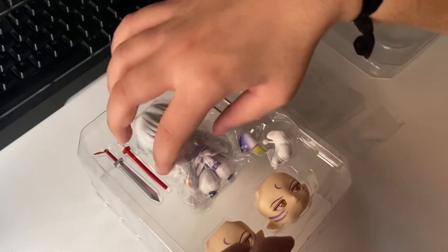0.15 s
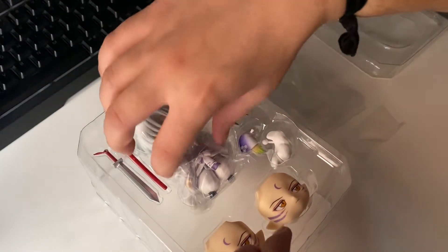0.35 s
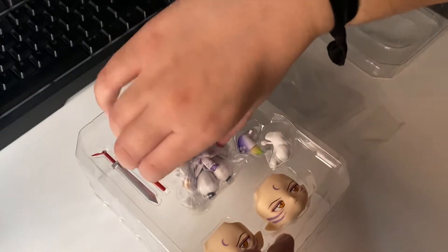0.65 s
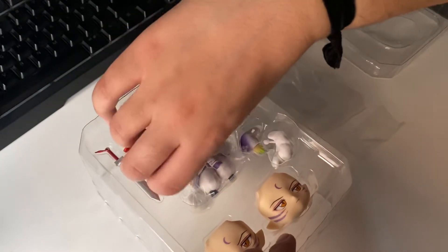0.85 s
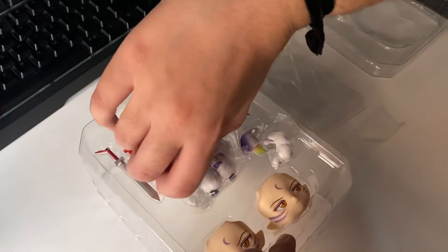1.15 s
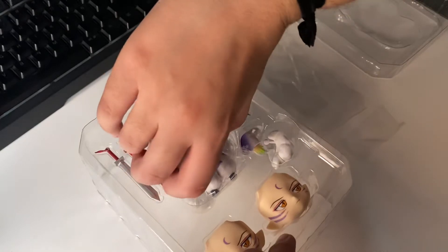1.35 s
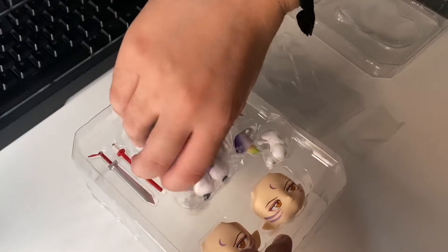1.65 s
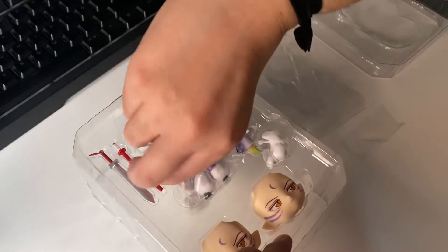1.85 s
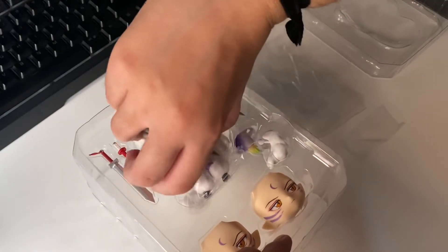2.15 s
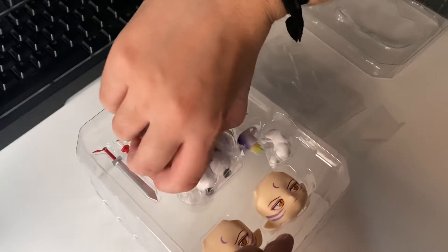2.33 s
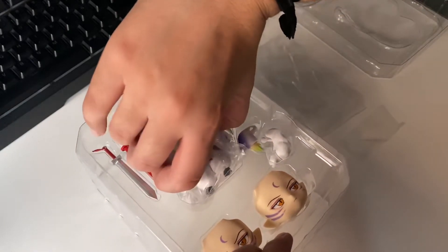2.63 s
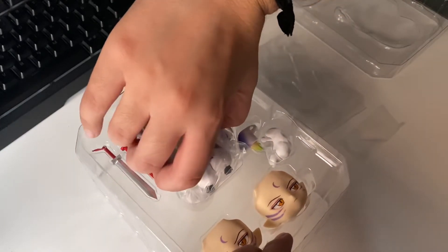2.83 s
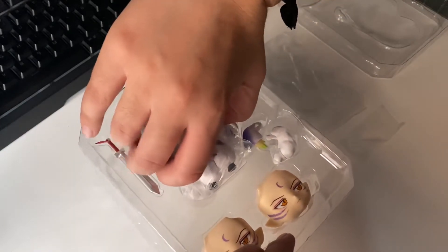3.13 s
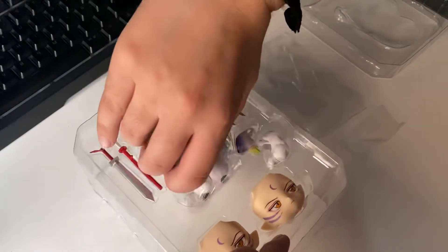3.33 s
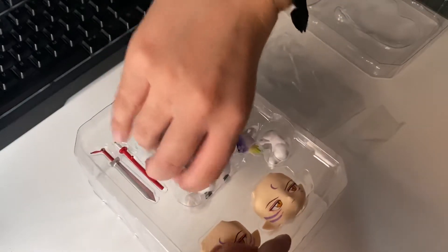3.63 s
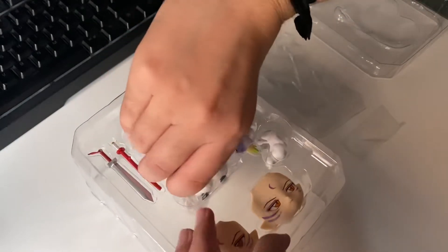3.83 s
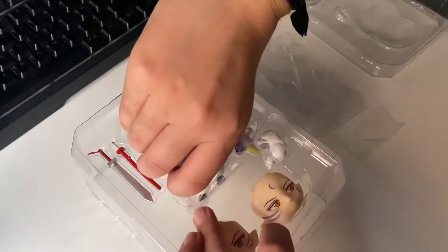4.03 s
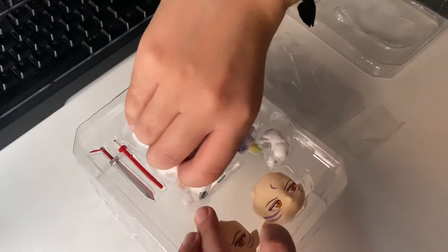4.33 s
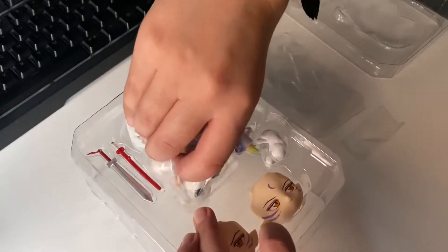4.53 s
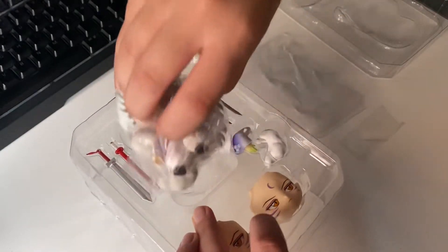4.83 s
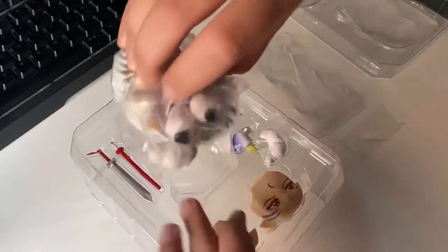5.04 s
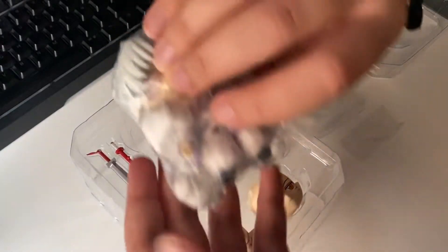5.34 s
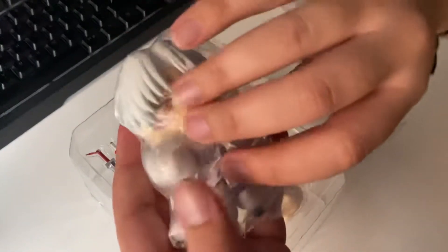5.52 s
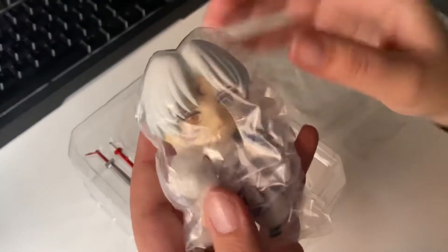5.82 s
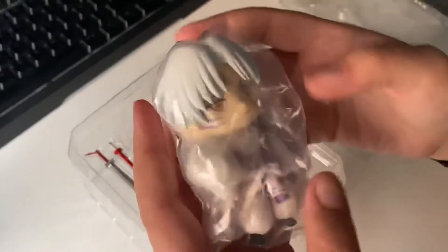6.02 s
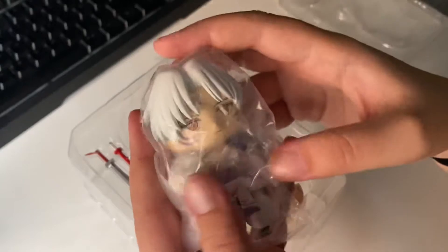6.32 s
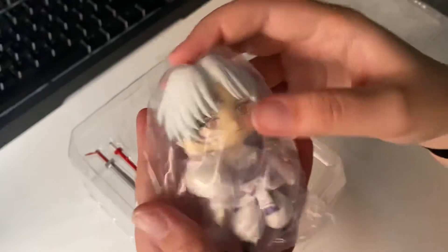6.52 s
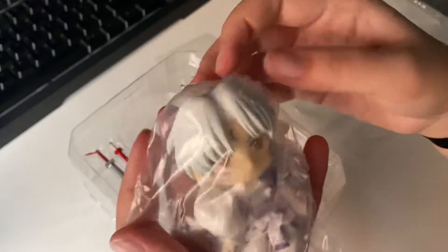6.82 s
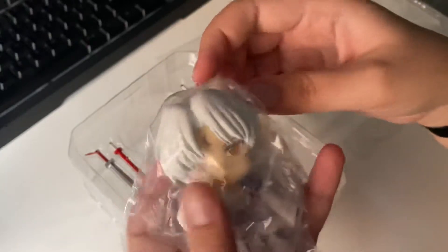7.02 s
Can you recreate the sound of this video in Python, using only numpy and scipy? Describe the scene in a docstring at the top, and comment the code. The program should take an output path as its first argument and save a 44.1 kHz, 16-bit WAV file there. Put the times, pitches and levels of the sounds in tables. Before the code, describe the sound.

Close plastic creaking and hollow knocks with one loud buckle, followed by crisp, dense crinkling of thin film around a small figurine.

```python
"""A moulded plastic tray creaks, knocks and buckles loudly as a hand works a bagged figurine out of it.
The tray rings in its modes, driven by stick-slip jerks and flips of its wall; the buckling bumps the desk.
The thin bag crinkles in clusters of tiny facet clicks, with single snaps and quick chains of them.
Once the bag is raised, it slides over the palm, fingertips pat the figurine and a hard part of it ticks.
A small room, faint noise and a low rumble surround this; two close ports differ in phase."""
import sys
import numpy as np
from scipy import signal
from scipy.fft import rfft, irfft, next_fast_len
from scipy.io import wavfile
from scipy.ndimage import uniform_filter1d

SR = 44100
rng = np.random.default_rng(int(sys.argv[2]) if len(sys.argv) > 2 else 0)


def to_wav(sig):
    """Store sig (one row per channel, or 1-D mono) as 16-bit WAV at the path in sys.argv[1].

    Samples outside -1..1 are clipped; the rate is SR.
    """
    pcm = np.clip(np.atleast_2d(sig), -1, 1) * 32767
    pcm = np.round(pcm).astype(np.int16)
    wavfile.write(sys.argv[1], SR, pcm.T)  # frames by channels


N = 316197
T = np.arange(N) / SR

# Levels are relative: mixing, balance and room come later.
# Room noise colour: (frequency [Hz], gain [dB])
ROOM_NOISE_COLOUR = [(30, -23.5), (110, 13.5), (650, -17.5), (2000, -10.5), (16000, -26)]
# Rumble colour: (frequency [Hz], gain [dB])
RUMBLE_COLOUR = [(20, -20.5), (33, -7.5), (80, 7.5), (100, -2.5), (118, 12), (150, -11.5), (250, -1),
                 (900, -38)]
# Rumble: (time [s], level [dB])
RUMBLE_LEVEL = [(0, -69), (.25, -83), (.7, -60), (1.1, -78), (1.5, -66), (2.3, -64), (2.7, -64.5),
                (3.2, -70), (3.26, -44.5), (3.45, -58), (4.5, -55.5), (5.3, -64), (6.7, -60)]

# Tray modes: (frequency [Hz], strength [dB], undamped t60 [s]); below WALL_HZ whole tray, above it walls
TRAY_MODES = [(224.4, -7.5, 0.051), (295, -10.5, 0.17), (370, -8, 0.073), (437, -5, 0.17),
              (496, 3.5, 0.063), (581.3, 3, 0.053), (697, -1.5, 0.073), (850, -4.5, 0.11),
              (995, -4.5, 0.05), (1079, -7.5, 0.076), (1257, -8, 0.027), (1384, -10.5, 0.018),
              (1646, -13, 0.069), (1940, -24.5, 0.011)]
WALL_HZ = 400
# Freedom of the whole tray to flex under the hand: (time [s], gain [dB])
FLEX = [(0, -0.5), (1.35, -9.5), (1.55, 1), (2.3, 3), (2.8, -6), (3.15, -7), (3.23, -3), (3.6, 3),
        (4.5, -1.5), (5.1, -4.5)]
# Dry crack of the stiff tray wall: (frequency [Hz], gain [dB])
WALL_CRACK_COLOUR = [(400, -17), (900, 6.5), (1600, 10.5), (2200, 2.5), (2900, 6), (4200, -4),
                     (9000, -22.5)]
# Pushes dragging fingers and figurine along the tray: (time [s], length [s], level [dB])
PUSHES = [(.452, 0.0066, -47.5), (.588, .03, -47.5), (.666, 0.02, -54), (.78, 0.02, -42),
          (.81, 0.056, -40.5), (1.203, 0.008, -50), (1.31, 0.015, -52), (1.372, 0.042, -39),
          (1.438, 0.055, -34), (1.615, 0.019, -46), (1.77, 0.057, -49.5), (1.905, 0.019, -44.5),
          (2.235, 0.0089, -39.5), (2.3, 0.02, -57.5), (2.48, 0.008, -49), (2.848, 0.022, -49),
          (2.945, 0.018, -43.5), (3.073, 0.0072, -42), (3.19, 0.03, -37.5), (3.234, 0.047, -24.5),
          (3.32, 0.077, -43), (3.447, 0.026, -46), (3.503, 0.013, -41), (3.608, 0.0099, -42),
          (3.724, 0.022, -35.5), (3.85, 0.0047, -41.5), (4.002, 0.024, -38), (4.097, 0.046, -38),
          (4.225, 0.029, -46), (4.33, 0.0082, -39), (4.475, 0.065, -42), (4.56, 0.032, -46.5),
          (4.802, 0.054, -49.5), (4.934, 0.016, -47), (4.982, 0.029, -42.5)]
PUSH_ATTACK_S, PUSH_T60_S = 0.02, 0.13
# Light rubbing of the resting hand: (time [s], level [dB])
RESTING = [(0, -65.5), (.1, -89), (.3, -76.5), (.6, -57.5), (.9, -58), (1.15, -69), (1.55, -49.5),
           (2.1, -49.5), (2.35, -51.5), (2.7, -57), (3.05, -56), (3.85, -51), (4.25, -53), (4.65, -54),
           (4.78, -80), (5.06, -54), (5.15, -75), (5.4, -72.5), (5.6, -86)]
# Tray wall giving way or being knocked: (time [s], level [dB], centre of answering modes [Hz])
KNOCKS = [(0.142, -67, 800), (0.3772, -52, 1440), (0.4486, -40.5, 1130), (0.566, -46, 434),
          (0.5891, -39.5, 584), (0.668, -46.5, 630), (0.744, -50.5, 684), (0.789, -48, 556),
          (0.8157, -41, 640), (.856, -49, 540), (0.973, -45, 1520), (0.992, -38.5, 614),
          (1.018, -41.5, 657), (1.3669, -45.5, 710), (1.4224, -39, 810), (1.4636, -34.5, 665),
          (1.4979, -37.5, 640), (1.7059, -35.5, 755), (1.898, -43.5, 1080), (2.2445, -39, 560),
          (2.2983, -42.5, 560), (2.381, -34, 560), (2.841, -42, 600), (2.8868, -38, 700), (2.928, -34, 607),
          (3.108, -40.5, 946), (3.1624, -40, 630), (3.2272, -24.5, 640), (3.2307, -21, 352),
          (3.2605, -28.5, 1003), (3.269, -35, 617), (3.2905, -28, 721), (3.324, -39.5, 610),
          (3.454, -37, 640), (3.5904, -48, 920), (3.6139, -37, 472), (3.996, -35.5, 620),
          (4.0915, -45, 600), (4.219, -40.5, 490), (4.508, -43, 850), (4.5802, -40, 755),
          (4.6539, -40, 524), (4.799, -45.5, 590), (4.986, -53, 660), (5.025, -44, 524)]
# Tray, left minus right: (frequency [Hz], level difference [dB])
TRAY_BALANCE = [(300, 0.5), (450, -8), (620, -0.5), (900, -1.5), (2000, -1)]
THUMP_S = 3.229  # buckling tray bumps the desk

# Film rustle: (time [s], length [s], level [dB])
FILM_RUSTLES = [(.005, 0.037, -68), (.335, 0.05, -63), (.556, 0.032, -54), (.932, 0.012, -60),
                (1.42, 0.046, -48), (1.599, 0.032, -56), (1.645, 0.063, -54), (1.772, 0.056, -54),
                (1.892, 0.04, -52), (2.02, 0.02, -52.5), (2.22, 0.033, -56), (3.22, 0.093, -47.5),
                (3.437, 0.031, -49), (3.595, 0.084, -54), (3.857, 0.032, -52.5), (3.997, 0.032, -52.5),
                (4.15, 0.11, -54), (4.65, 0.0091, -46), (5.392, 0.019, -52.5), (5.479, 0.094, -53),
                (5.566, 0.06, -49), (5.66, 0.014, -48.5), (5.922, 0.041, -54), (6.185, 0.046, -49.5),
                (6.312, 0.1, -49), (6.395, 0.073, -49.5), (6.502, 0.035, -43.5), (6.571, 0.028, -41.5),
                (6.642, 0.05, -48), (6.88, 0.035, -40), (6.94, 0.078, -46.5), (7.085, 0.042, -49),
                (7.148, 0.028, -43.5)]
RUSTLE_ATTACK_S, RUSTLE_T60_S = 0.012, 0.1
# Steady crinkling between rustles: (time [s], level [dB])
HOLD = [(0, -104), (.27, -72.5), (.65, -65.5), (1.0, -65), (1.13, -72.5), (1.4, -64), (1.9, -58),
        (2.45, -71), (2.75, -73.5), (3.15, -68), (3.55, -68.5), (3.9, -62.5), (4.7, -57.5), (5.1, -91),
        (5.42, -57.5), (5.77, -69), (6.5, -47.5), (7.15, -60.5)]
PUSH_DRAG_DB = -23  # rubbing the tray also works the film
# Crinkle colour, bag in the tray: (frequency [Hz], gain [dB])
NESTED_COLOUR = [(200, -21), (700, 5), (1500, 0.5), (2800, 7.5), (4000, 0), (7000, -2), (11000, -11),
                 (14000, -2.5), (16000, -34.5)]
# Crinkle colour, bag held up: (frequency [Hz], gain [dB])
HELD_COLOUR = [(100, 2), (300, 9), (1100, 1.5), (2400, 0.5), (5200, 2), (11000, -6.5), (14000, -3),
               (16000, -40)]
LIFT_S = 4.59  # bag comes clear of the tray
# Single creases snapping through: (time [s], level [dB], brightness as treble over body [dB])
SNAPS = [(0.3779, -38, 9.5), (0.3855, -37.5, -7.5), (0.4462, -37, -6.5), (.552, -39, 14.5),
         (0.5905, -39, -4), (0.721, -42, 5), (.7462, -39, 6), (.813, -38, 12), (0.951, -43.5, 6),
         (0.975, -47, -8), (1.0483, -48, 3), (1.359, -48, 3.5), (1.379, -44, 1), (1.418, -37, 32),
         (1.439, -35.5, 7.5), (1.6403, -34, 7), (1.692, -40, -12), (1.7048, -38, -5.5), (1.779, -39, 2),
         (1.8055, -41, -10), (1.8228, -40, 13), (1.8572, -32, -8), (1.898, -45, -10), (1.918, -38.5, 4),
         (1.9743, -39.5, 14.5), (2.109, -44, -9), (2.135, -34.5, -6), (2.184, -38, -8.5),
         (2.217, -38.5, 2.5), (2.245, -39, 6), (2.4287, -32.5, 9), (2.4476, -37, 2.5), (2.609, -44, -6),
         (2.663, -39.5, 3), (2.803, -43.5, -2), (2.886, -39, 6.5), (3.104, -40.5, -11.5), (3.142, -40, 5.5),
         (3.1615, -35.5, -6.5), (3.282, -37, 2.5), (3.437, -38.5, 19), (3.4473, -36.5, 6),
         (3.6325, -36, 12.5), (3.662, -33, -7.5), (3.805, -37.5, -9), (3.825, -39.5, -1.5),
         (3.872, -45, -7), (3.875, -39.5, -7.5), (3.921, -34.5, 3.5), (3.972, -39.5, 13), (4.029, -47, 1.5),
         (4.2004, -38, -3), (4.215, -37.5, 4), (4.3461, -32.5, 1), (4.378, -38, 3), (4.419, -38.5, -1),
         (4.4314, -40, 11), (4.5916, -41, 6.5), (4.77, -43.5, -3.5), (4.9138, -35.5, 13), (5.114, -41, 5.5),
         (5.478, -32.5, 7), (5.512, -33, 11), (5.565, -27.5, 19), (5.586, -47, 12), (5.5959, -30.5, 16),
         (5.615, -39, 18), (5.786, -45, -1), (5.8157, -38.5, -1.5), (5.923, -38.5, -1.5), (5.939, -38, 7.5),
         (5.964, -46, 14), (6.09, -40, 1), (6.146, -32, 0), (6.1846, -30, 11.5), (6.224, -41, 18),
         (6.2708, -29, 5.5), (6.3648, -27, 0.5), (6.3916, -37, 2), (6.409, -26.5, 5), (6.4512, -35, 15),
         (6.472, -27.5, 11), (6.4875, -37, 2), (6.5065, -35, 4), (6.522, -30.5, 1.5), (6.565, -30, 12),
         (6.604, -35, 13), (6.63, -32, 9.5), (6.647, -33, 19), (6.651, -34, 9.5), (6.6724, -35, 5),
         (6.686, -31, 5.5), (6.749, -34, 4.5), (6.777, -29.5, -0.5), (6.8, -34, 6.5), (6.856, -32.5, 5),
         (6.8899, -40, 13), (6.968, -39, 13), (6.995, -35, 5), (7.0086, -33, 11), (7.032, -37.5, 6),
         (7.084, -46, 10), (7.1124, -33.5, 10.5)]
SNAP_CRACK_S = 0.00033  # decay constant of a facet at FACET_HZ; larger facets take longer
# A brighter snap comes from a smaller facet, which rings higher
FACET_HZ, FACET_DB_PER_OCTAVE, FACET_RANGE_HZ = 4930, 10.5, (1604, 11460)
# Uneven modes of crumpled film: spacing [spectrum bins], spread of strength [dB]
FILM_MODE_BINS, FILM_MODE_DB = 7, 6.5
CLICK_LEAD = 64  # samples ahead of a click's onset
# Creases running across the film: (time [s], length [s], level [dB], central facet pitch [Hz])
RUNS = [(1.843, 0.012, -53, 2800), (3.225, 0.0049, -32, 4000), (3.248, 0.042, -45.5, 4000),
        (3.644, 0.012, -46, 3160), (4.214, 0.0083, -43, 2600), (6.2224, 0.006, -36.5, 4600),
        (6.358, 0.011, -42.5, 3900), (6.507, .02, -39.5, 5360), (6.561, 0.0297, -42, 6000),
        (6.886, 0.015, -39.5, 5970), (6.9, 0.037, -49.5, 5100), (7.017, 0.026, -42.5, 4400),
        (7.151, 0.014, -48, 5540)]
RUN_SNAPS_PER_S = 650
# Bag, left minus right: (frequency [Hz], level difference [dB])
BAG_BALANCE = [(100, -6.5), (600, -5), (2400, -6), (4500, -5.5), (7000, -1.5), (16000, 1)]

# Bag sliding over the palm as it is raised: (time [s], level [dB])
SLIDE = [(5.1, -100), (5.2, -66.5), (5.3, -71), (5.45, -65), (5.55, -100)]
# Fingertips landing on the bagged figurine: (time [s], level [dB], pitch [Hz])
PATS = [(5.514, -53.5, 350), (5.659, -55, 310), (5.707, -53, 221), (6.223, -49, 348), (6.653, -51.5, 392),
        (6.72, -51, 340), (6.902, -60, 273)]
# Hard figurine part clicking as it settles: (frequency [Hz], strength [dB], t60 [s])
TICK_MODES = [(3700, -8, .012), (4450, 0, .012), (4900, -2, .014), (7250, -9, .01)]
TICK_S = 5.8165

ROOM_T60_S, ROOM_TREBLE_T60_S = 0.38, 0.13
# Phase lead of the left port: (frequency [Hz], phase [rad])
PORT_PHASE = [(0, 0), (600, -.05), (2500, -.6), (5800, -.4), (6900, .4), (9000, 3.1), (11300, 5.8),
              (13400, 6.9), (15500, 9.4)]
TOP_HZ = 15800


def undb(db):
    """Decibels to gain."""
    return 10 ** (np.asarray(db) / 20)


def rms(x):
    """Root mean square."""
    return np.sqrt(np.mean(x ** 2)) + 1e-12


def gain_curve(rows):
    """Gain at every sample from (time [s], level [dB]) rows."""
    return undb(np.interp(T, *np.transpose(rows)))


def response(points, hz):
    """Gain at hz from (frequency [Hz], gain [dB]) points."""
    f, db = np.transpose(points)
    return undb(np.interp(np.log(hz + 1), np.log(f), db))


def colour(x, points):
    """Filter by (frequency [Hz], gain [dB]) points."""
    length = x.shape[-1]
    size = 2 * next_fast_len(length // 2 + SR // 40, real=True)
    hz = np.fft.rfftfreq(size, 1 / SR)
    return irfft(rfft(x, size) * response(points, hz))[..., :length]


def place(x, balance):
    """Split a left-minus-right balance evenly over both channels."""
    left = colour(x[0], [(f, db / 2) for f, db in balance])
    right = colour(x[1], [(f, -db / 2) for f, db in balance])
    return np.array([left, right])


def add(out, s, x):
    """Mix a short stereo sound in at time s."""
    i = max(int(s * SR), 0)
    out[:, i:i + x.shape[-1]] += x[:, :max(N - i, 0)]


def ring(x, tail):
    """Convolve with a response."""
    return signal.oaconvolve(np.atleast_2d(x), np.atleast_2d(tail), axes=-1)[:, :N]


def fade(t, t60):
    """Exponential decay by 60 dB in t60 seconds."""
    return np.exp(-np.log(1000) * t / t60)


def steady(x, span_s):
    """Even the level out to about 1 over span_s; faster grain stays."""
    size = max(int(span_s * SR), 8)
    power = np.mean(x ** 2, axis=0)
    power = uniform_filter1d(uniform_filter1d(power, size), size)
    return x / np.sqrt(np.maximum(power, 0) + 1e-4 * power.mean())


def walk(rate):
    """Slow random wander, rate knots per second, spread near 1."""
    knots = rng.standard_normal(400)
    return 1.57 * np.interp(T * rate, np.arange(len(knots)), knots)


def slips(rate, spread_db):
    """Random impulses, rate per second: many small, a few large."""
    chance = rng.random(N)
    size = np.minimum(rng.exponential(size=N), 4)
    sign = rng.choice([-1, 1], N)
    return (chance < rate / SR) * undb(spread_db * size) * sign


def efforts(rows, attack_s, t60):
    """Gain of timed bouts of activity: each swells, holds for its length and dies away."""
    power = np.zeros(N)
    for s, length_s, db in rows:
        start, stop = int((s - attack_s) * SR), int((s + length_s + t60) * SR)
        span = slice(max(start, 0), stop)
        t = T[span] - s
        swell = np.clip(1 + t / attack_s, 0, 1) ** 2
        release = fade(np.maximum(t - length_s, 0), t60)
        power[span] += (undb(db) * swell * release) ** 2
    return np.sqrt(power)


def click(facet_hz, facet_db, crack_s, scatter_s, scatter_db, octaves=0.11):
    """A crack rings one facet; brief scatter follows through random uneven modes."""
    t = np.arange(1024) / SR
    crack = rng.standard_normal(len(t)) * t * np.exp(-t / crack_s)
    bins = np.arange(len(t) // 2 + 1) / FILM_MODE_BINS
    strengths = rng.standard_normal(len(bins))
    film_modes = undb(FILM_MODE_DB * np.interp(bins, np.arange(len(bins)), strengths))
    noise = 0.5 * rng.standard_normal(len(t)) + rng.standard_normal((2, len(t)))
    noise = irfft(rfft(noise) * film_modes)
    scatter = noise * np.exp(-t / scatter_s) * (1 - np.exp(-t / crack_s / 2))
    x = crack / rms(crack) + undb(scatter_db) * scatter / rms(scatter)
    spectrum = rfft(np.pad(x, ((0, 0), (CLICK_LEAD, CLICK_LEAD))))
    # flatten the broad spectrum, then raise the facet's band
    broad = uniform_filter1d(np.mean(abs(spectrum) ** 2, axis=0), size=130)
    hz = np.linspace(1, SR / 2, len(broad))
    peak = np.exp(-(np.log2(hz / facet_hz) / octaves) ** 2)
    resonance = undb(facet_db * (peak - 1.22))
    return irfft(spectrum * resonance / np.sqrt(broad))


def mode_ring(hz, t60, skew, scatter=1, build=0.34):
    """One unit-energy mode: random start within `scatter` turns, quick build-up, ports skewed in phase."""
    t = np.arange(SR // 6) / SR
    phase = 2 * np.pi * scatter * rng.random() + np.array([[skew], [-skew]])
    x = np.sin(2 * np.pi * hz * t + phase) * fade(t, t60)
    x = x * (1 - np.exp(-(hz * t / build) ** 2))  # build in cycles
    return x / np.sqrt(np.sum(x ** 2) / 2)


def background(noise_db=-75, rumble_db=0):
    """Faint room noise, and a rumble largely shared by both ports."""
    air = rng.standard_normal(N) + 0.15 * rng.standard_normal((2, N))
    air = colour(air, ROOM_NOISE_COLOUR)
    rumble = rng.standard_normal(N) + 0.35 * rng.standard_normal((2, N))
    rumble = steady(colour(rumble, RUMBLE_COLOUR), span_s=0.13) * gain_curve(RUMBLE_LEVEL)
    return undb(noise_db) * air / rms(air) + undb(rumble_db) * rumble


def rubbing():
    """How hard the tray is rubbed: pushes on top of the resting hand."""
    return np.hypot(efforts(PUSHES, PUSH_ATTACK_S, PUSH_T60_S), gain_curve(RESTING))


def stick_slip(rate):
    """The contact sticks unevenly, then lets go: the longer it stuck, the harder the jerk."""
    stuck = rng.gamma(2, 0.5, size=3000)
    samples = (np.cumsum(stuck) / rate * SR).astype(int)
    return np.bincount(samples, stuck, N)[:N]


def bending_mode(push, hz, t60, bend, skew):
    """One driven mode whose pitch wanders by the share `bend` as pressure on the wall changes."""
    turn = np.exp(2j * np.pi * np.cumsum(hz * (1 + bend * walk(rate=16))) / SR)
    pole = fade(1 / SR, t60)
    band = signal.butter(1, [hz / 1.5, hz * 1.5], "bandpass", fs=SR, output="sos")
    push = signal.sosfilt(band, push)
    # shift to 0 Hz, resonate there, shift back
    z = turn * signal.lfilter([np.sqrt(1 - pole ** 2)], [1, -pole], push * turn.conj())
    return np.imag(z * np.exp(1j * np.array([[skew], [-skew]])))


def wall_crack():
    """The brief broad crack of one jerk of the tray wall."""
    x = click(960, facet_db=7.5, crack_s=0.00039, scatter_s=0.01, scatter_db=3.0, octaves=0.74)
    return colour(x, WALL_CRACK_COLOUR)


def tray_rub(level_db=-1, rasp_db=-9, wander_db=3.5, skew=0.51, grit_db=-19):
    """Stick-slip jerks and fine grit ring and crack the tray; its modes bend and take turns to lead."""
    grit = slips(rate=700, spread_db=2.5)
    jerks = stick_slip(rate=100) + undb(grit_db) * grit
    flex = gain_curve(FLEX)
    body = 0
    for hz, db, t60 in TRAY_MODES:
        push = jerks * rng.standard_normal(N) * undb(db + wander_db * walk(rate=14))
        if hz < WALL_HZ:
            push = push * flex
        body = body + bending_mode(push, hz, t60, 0.025, skew * rng.standard_normal())
    # a tray that flexes freely also crackles more
    rasp = steady(ring(jerks, wall_crack()), span_s=0.12) * flex
    body = steady(body, span_s=0.022)
    return (body * undb(level_db) + rasp * undb(rasp_db)) * rubbing()


def film_motion():
    """How strongly the film sounds: rustles, drag from rubbing the tray and the steady crinkling."""
    rustles = efforts(FILM_RUSTLES, RUSTLE_ATTACK_S, RUSTLE_T60_S)
    drag = undb(PUSH_DRAG_DB) * rubbing()
    return np.sqrt(rustles ** 2 + drag ** 2 + gain_curve(HOLD) ** 2)


def crinkle(nested_db=2, held_db=-1, hiss_db=-15, hiss_growth=0.99, crease_rate=90,
            crease_db=-2, count=13):
    """Clusters of snaps from large and small facets; when faint they recede under sliding hiss."""
    swarm = 0
    # a long crease flips many facets at once
    creases = slips(rate=crease_rate, spread_db=3.0) * undb(crease_db)
    cluster = undb(7 * np.clip(walk(rate=50), -2, 2))
    for facet_hz in np.geomspace(1100, 13000, count):
        flips = slips(rate=32 * cluster, spread_db=4.2)
        facet = click(facet_hz, facet_db=10, crack_s=0.0003, scatter_s=0.003, scatter_db=-3, octaves=0.55)
        hits = flips + creases * rng.choice([-1, 1], N)
        swarm = swarm + ring(hits, facet) * (facet_hz / 4000) ** -0.15
    noise = rng.standard_normal(N) + 1.66 * rng.standard_normal((2, N))
    motion = film_motion()
    grain = steady(swarm, span_s=0.086) * motion * np.minimum(motion / undb(-67.0), 1)
    hiss = undb(hiss_db) * noise * rms(motion) * (motion / rms(motion)) ** hiss_growth
    film = grain + hiss
    lifted = np.clip((T - LIFT_S) / 0.078, 0, 1)
    nested = (1 - lifted) * undb(nested_db) * colour(film, NESTED_COLOUR)
    held = lifted * undb(held_db) * colour(film, HELD_COLOUR)
    return nested + held


def tray_knocks(level_db=0, crack_db=-8, damping=0.87, focus_db=12, octaves=0.65, bend=0.028):
    """A wall patch flips under a fingertip, which damps and detunes it; nearby modes answer most."""
    out, flex = np.zeros((2, N)), gain_curve(FLEX)
    for s, knock_db, centre_hz in KNOCKS:
        x = 0
        chances = rng.standard_normal((len(TRAY_MODES), 3))
        for (hz, db, t60), (weight, lag, detune) in zip(TRAY_MODES, chances):
            near_db = -focus_db * np.log(1 + (np.log2(hz / centre_hz) / octaves) ** 2)
            size = undb(db / 2 + near_db + 2 * weight)
            if hz < WALL_HZ:
                size = size * flex[int(s * SR)]
            mode_hz = hz * (1 + bend * detune)
            x = x + size * mode_ring(mode_hz, t60 * damping, 0.3 * lag, scatter=0.6, build=0.8)
        crack = wall_crack()
        # levels refer to the first 10 ms
        add(out, s, x / rms(x[:, :SR // 100]) * undb(knock_db + level_db))
        crack = crack / rms(crack[:, :SR // 100]) * undb(knock_db + crack_db)
        add(out, s - CLICK_LEAD / SR, crack)
    return out


def snaps(level_db=0, bass_db=-20, low_db=-4, air_db=-1, top_db=-9, pan_db=3.0, body_share=0.87):
    """Creases flip briefly: a large facet gives body and a low ring, a small one air and a high ring."""
    out = np.zeros((2, N))
    for s, db, bright_db in SNAPS:
        facet_hz = np.clip(FACET_HZ * 2 ** (bright_db / FACET_DB_PER_OCTAVE), *FACET_RANGE_HZ)
        body, air = -body_share * bright_db, (1 - body_share) * bright_db
        crack_s = SNAP_CRACK_S * (FACET_HZ / facet_hz) ** 2.12
        x = click(facet_hz, facet_db=8, crack_s=crack_s, scatter_s=0.002, scatter_db=-3, octaves=0.22)
        x = colour(x, [(250, body + bass_db), (900, body + low_db), (2200, body), (5500, 0.008),
                       (11500, air + air_db), (16000, air + top_db)])
        ears = undb(pan_db * rng.standard_normal() * np.array([[1], [-1]]) / 2)
        add(out, s - CLICK_LEAD / SR, 20 * x * ears * undb(db + level_db))
    return out


def crease_runs(level_db=0, spread_db=4, spread_octaves=1.0, facet_db=8):
    """A fold travels along the film; each facet on its way snaps with its own pitch and strength."""
    out = np.zeros((2, N))
    for s, length_s, db, hz in RUNS:
        chain = np.zeros((2, N // 64))
        chances = rng.standard_normal((40, 2))
        for k, (size, pitch) in enumerate(chances):
            when = (k + rng.random()) / RUN_SNAPS_PER_S
            facet_hz = np.clip(hz * 2 ** (spread_octaves * pitch), *FACET_RANGE_HZ)
            x = click(facet_hz, facet_db, crack_s=0.0003, scatter_s=0.003, scatter_db=-4, octaves=0.3)
            if when < length_s:
                add(chain, when, x * undb(spread_db * size))
        chain = colour(chain, [(300, 3.5), (1200, -4), (2500, 5), (7000, 10.5), (11000, 4.5),
                               (14000, 10.5), (16000, -19.5)])
        mean_level = np.sqrt(np.sum(chain ** 2) / (2 * length_s * SR))
        add(out, s - CLICK_LEAD / SR, chain * undb(db + level_db) / mean_level)
    return out


def thump(level_db=-44.0, hz=130, t60=0.11):
    """The buckling tray kicks against the desk: one dull, low noise burst."""
    out, t = np.zeros((2, N)), np.arange(SR // 4) / SR
    x = rng.standard_normal(len(t)) * fade(t, t60) * (1 - np.exp(-t / 0.0017))
    x = colour(x, [(hz / 5, -6), (hz / 2, -4), (hz, 0), (hz * 2, -14), (hz * 10, -60)])
    add(out, THUMP_S, np.array([x, x]) / rms(x[:SR // 40]) * undb(level_db))
    return out


def slide():
    """Smooth film on skin: a bright hiss without grain."""
    hiss = rng.standard_normal(N) + 0.5 * rng.standard_normal((2, N))
    hiss = colour(hiss, [(1000, -27.0), (6000, 4.5), (12000, 1.5), (16000, -13.5)])
    return gain_curve(SLIDE) * hiss / rms(hiss)


def pats(level_db=1, t60=0.025, palm_ratio=0.58):
    """Fingertips meet the figurine through the film: a dull bump, with a lower one from the holding hand."""
    out = np.zeros((2, N))
    for s, db, hz in PATS:
        x = mode_ring(hz, t60, 0) + 0.5 * mode_ring(hz * palm_ratio, t60, 0)
        add(out, s, x / rms(x[:, :SR // 100]) * undb(db + level_db))
    return out


def figurine_tick(level_db=-46.5, wet_db=-5, room_t60=0.4):
    """Hard plastic on hard plastic: a short high tick that lingers faintly in the room."""
    out, t = np.zeros((2, N)), np.arange(SR // 3) / SR
    x = 0
    for hz, db, t60 in TICK_MODES:
        x = x + undb(db) * mode_ring(hz, t60, 0.2 * rng.standard_normal())
    add(out, TICK_S, x / rms(x[:, :SR // 200]) * undb(level_db))
    tail = rng.standard_normal((2, len(t))) * fade(t, room_t60)
    return out + undb(wet_db) * ring(out, tail / np.sqrt(np.sum(tail ** 2) / 2))


def room(x, wet_db, echo_db, echo_s=0.067):
    """A diffuse tail whose treble dies first, and one faint late echo."""
    t = np.arange(SR // 2) / SR
    noise = rng.standard_normal((2, len(t)))
    low = signal.sosfilt(signal.butter(2, 3000, fs=SR, output="sos"), noise)
    treble = noise - low
    tail = low * fade(t, ROOM_T60_S) + 1.47 * treble * fade(t, ROOM_TREBLE_T60_S)
    tail = tail * np.clip(t / 0.018, 0, 1)
    tail = tail / np.sqrt(np.sum(tail ** 2) / 2)
    lag = int(echo_s * SR)
    echo = np.pad(x, ((0, 0), (lag, 0)))[:, :N]
    return x + undb(wet_db) * ring(x, tail) + undb(echo_db) * echo


def scene():
    """Tray and bag in the room, with the tick and the background."""
    tray = place(tray_rub() + tray_knocks() + thump(), TRAY_BALANCE)
    bag = place(crinkle() + snaps() + crease_runs() + slide() + pats(), BAG_BALANCE)
    tray = room(tray, wet_db=-17, echo_db=-28)
    bag = room(bag, wet_db=-12.5, echo_db=-29.5)
    return background() + tray + bag + figurine_tick()


def record(dry):
    """The two ports differ in phase, most in the treble; the top is cut."""
    size = 2 * next_fast_len(N // 2 + SR // 40, real=True)
    phase = np.interp(np.fft.rfftfreq(size, 1 / SR), *np.transpose(PORT_PHASE))
    shift = np.exp(0.5j * phase * np.array([[1], [-1]]))
    ports = irfft(rfft(dry, size) * shift)[:, :N]
    top_cut = signal.ellip(8, 0.1, 60, TOP_HZ, fs=SR, output="sos")
    return signal.sosfiltfilt(top_cut, ports)


dry = scene()
out = record(dry)
to_wav(out)
```